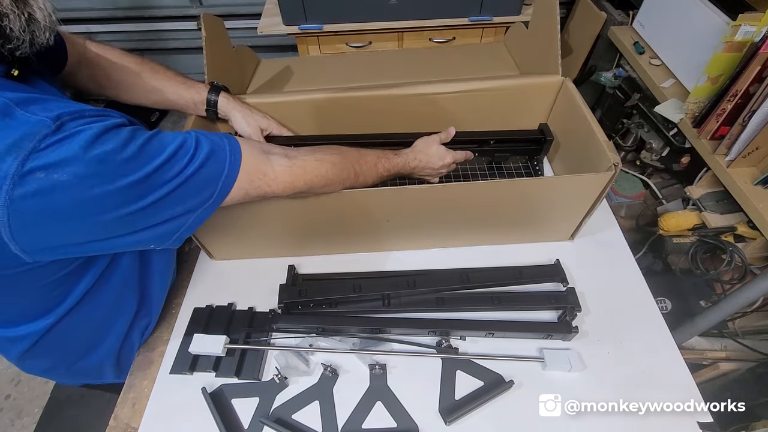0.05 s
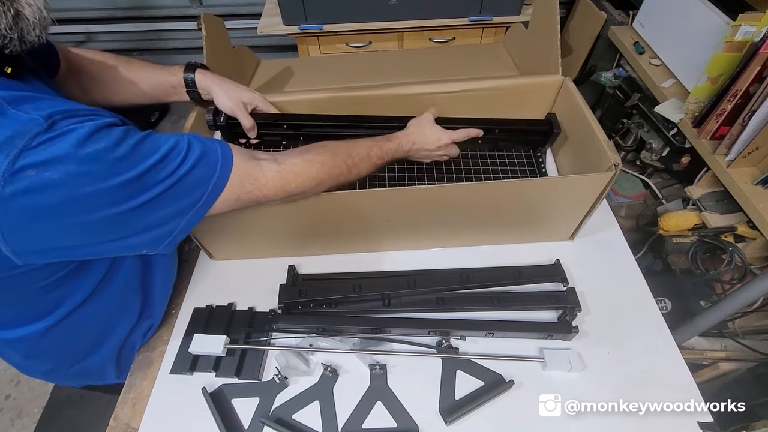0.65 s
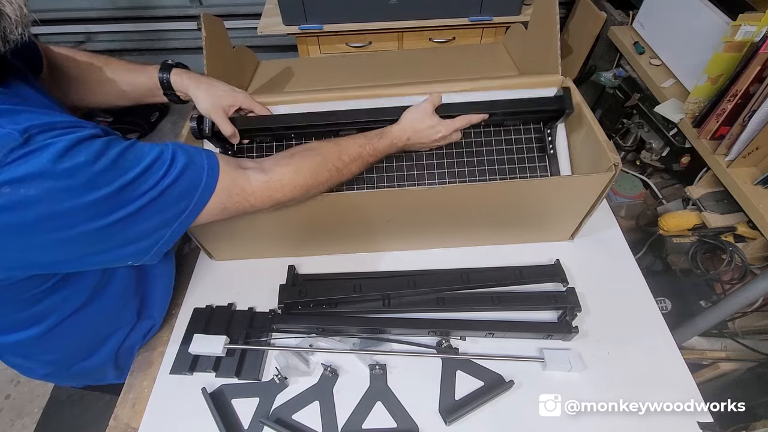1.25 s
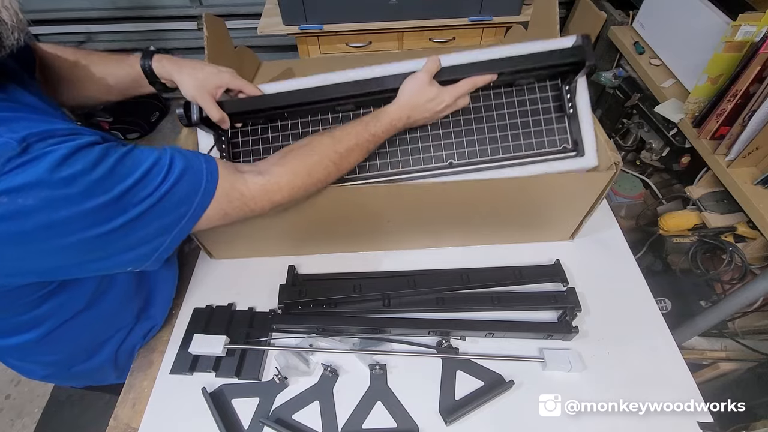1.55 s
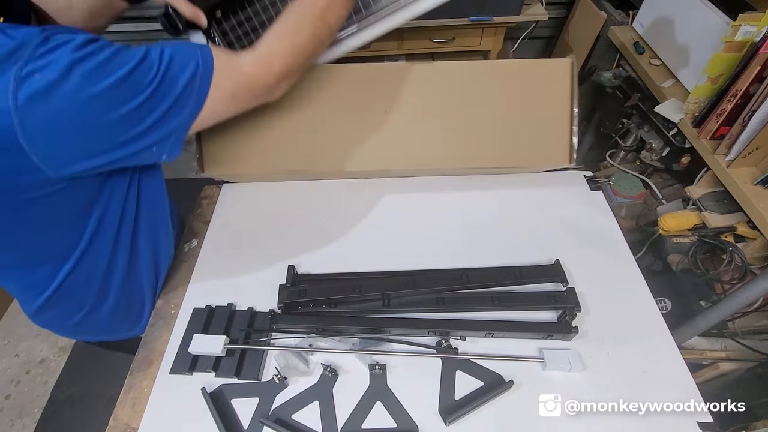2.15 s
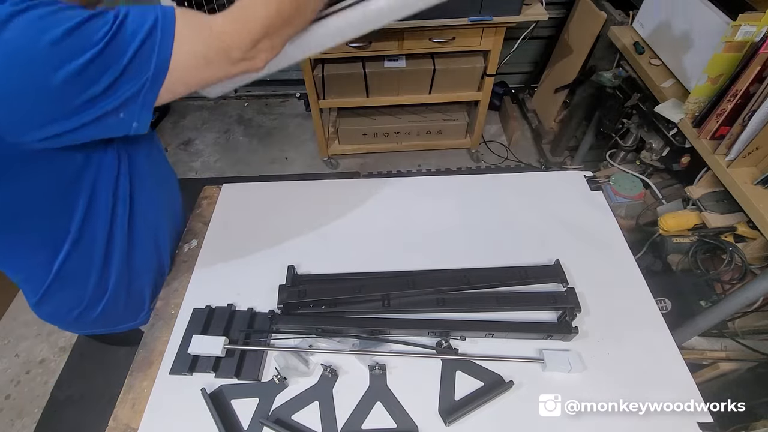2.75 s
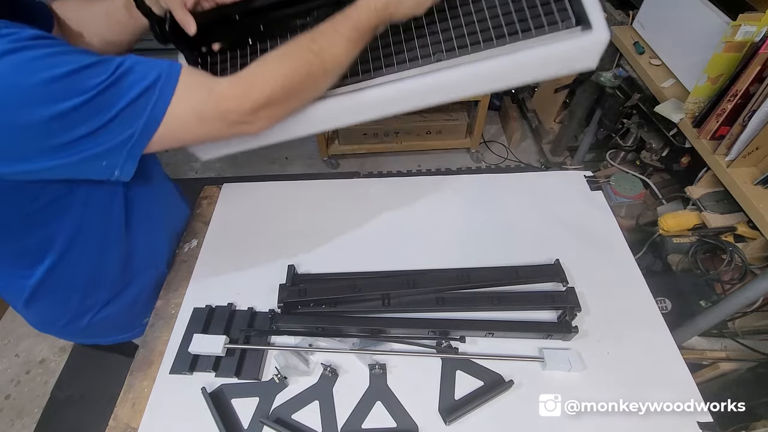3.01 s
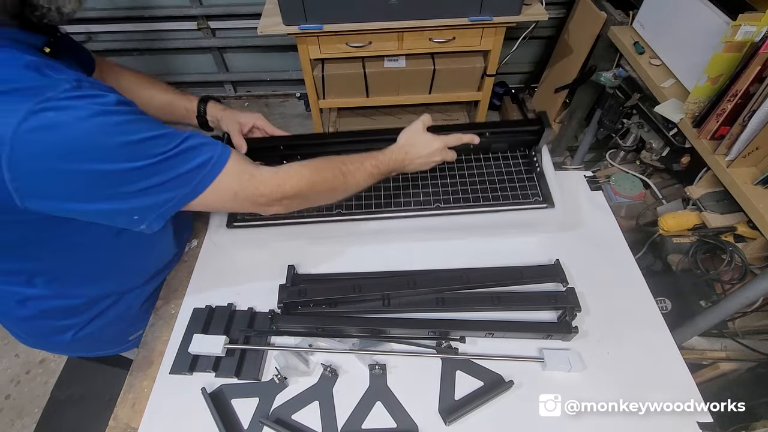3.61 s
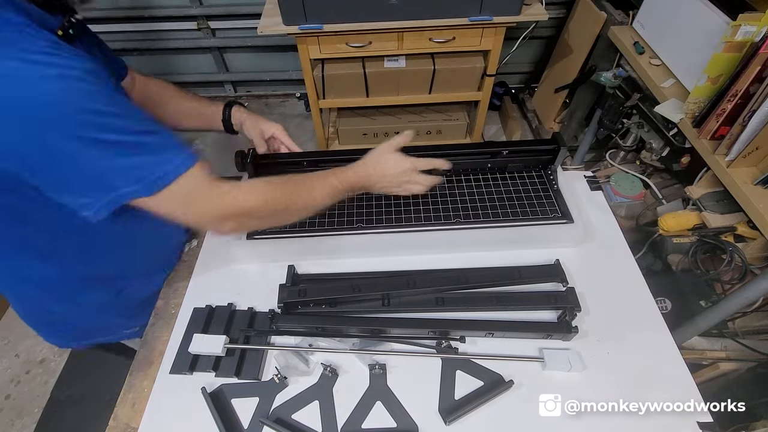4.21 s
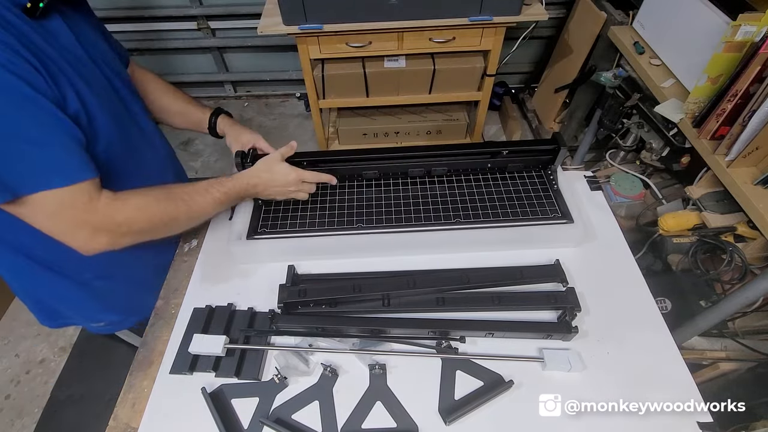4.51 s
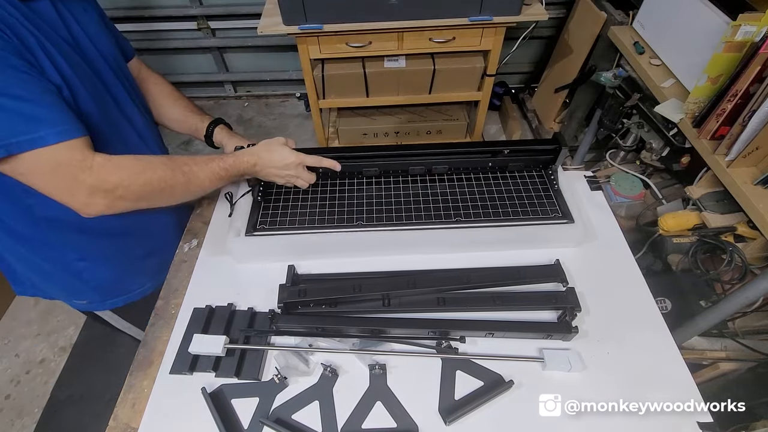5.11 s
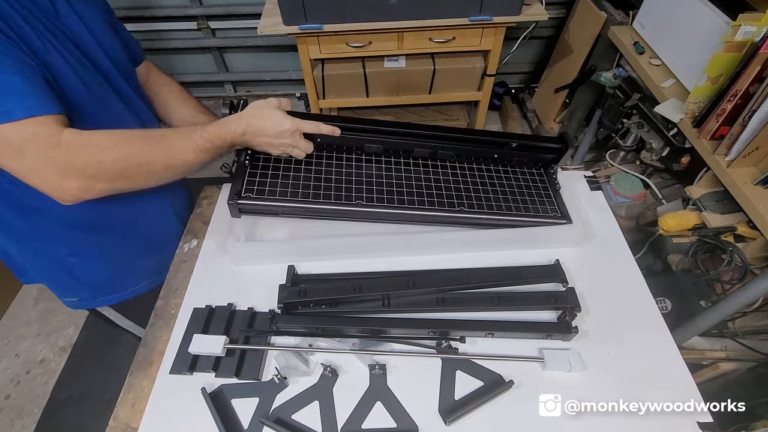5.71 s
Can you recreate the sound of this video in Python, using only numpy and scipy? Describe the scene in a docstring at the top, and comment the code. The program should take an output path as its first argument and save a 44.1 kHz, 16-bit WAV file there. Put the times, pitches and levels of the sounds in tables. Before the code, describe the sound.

In a quiet workshop with a short, dull echo, a foam-packed metal unit scrapes out of its cardboard box in several dry pulls. The box knocks, slides and falls to the floor in a run of hollow thumps and skids, with crisp snaps and one squeak. Faint handling follows as the unit is set down, then it drags briefly on the table, a small steel part clinking and the foam rustling.

```python
"""Short, rasping strokes of foam on cardboard: a packed metal unit is dragged out of a long box in a
workshop. The empty box slides off the table and tumbles on the floor with hollow booms, dry snaps
and a squeak. The unit is set down and shifted on the table; a small steel part clinks now and then.
The rubbing is stick-slip friction filtered by the panels. The blows excite damped modes of the
box's walls, the air inside it, the unit's frame and the steel part. The room adds a short tail."""
import sys
import numpy as np
from scipy import signal
from scipy.fft import rfft, irfft, next_fast_len
from scipy.io import wavfile
from scipy.ndimage import uniform_filter1d

SR = 44100
rng = np.random.default_rng(int(sys.argv[2]) if len(sys.argv) > 2 else 0)


def master(y):
    """Save y as 16-bit WAV."""
    cut = np.clip(np.atleast_2d(y).T, -1, 1)
    pcm = np.round(cut * 32767)  # scale
    wavfile.write(sys.argv[1], SR, pcm.astype(np.int16))


N = 258426
TIME = np.arange(N) / SR


def rubbing(judder_db=0.5, judder_per_s=130, hiss_db_per_db=1.13):
    """Sliding friction: slips drive the panels, and with pressure the hiss grows faster than the rasp."""
    # rubbing strokes: full_pressure_s, attack_s, hold_s, release_s, rasp_db, hiss_db, contact
    strokes = [(0.0, .05, 0.023, 0.075, -35.5, -41.5, "grip"),
               (0.142, 0.3, 0.13, 0.063, -38.5, -40.5, "grip"),
               (0.56, 0.027, 0.057, 0.3, -28.5, -44.5, "first pull"),
               (0.651, 0.075, .18, 0.095, -28.5, -38.5, "first pull"),
               (1.04, .1, .03, 0.15, -68, -96, "second pull"),
               (1.104, 0.044, 0.027, .08, -35, -69, "second pull"),
               (1.148, 0.064, 0.076, 0.072, -31.5, -40, "second pull"),
               (1.255, 0.057, 0.045, 0.075, -29.5, -31, "wall"),
               (1.346, 0.13, 0.033, 0.039, -55, -42, "wall"), (1.431, .05, 0.067, .1, -81, -73, "lift"),
               (1.541, 0.064, 0.053, .1, -62.5, -55.5, "lift"),
               (1.615, 0.041, 0.12, 0.059, -34, -39, "lift"),
               (1.794, 0.018, 0.17, 0.043, -40.5, -48.5, "lift"),
               (2.013, 0.025, 0.15, 0.33, -39, -44.5, "lift"),
               (2.23, 0.32, 0.09, 0.1, -28, -36, "box slide"),
               (2.744, 0.032, 0.033, 0.17, -26.5, -32.5, "floor skid"),
               (2.839, 0.064, 0.011, 0.19, -27, -39.5, "floor skid"),
               (2.903, 0.028, 0.013, .16, -27.5, -38, "floor skid"),
               (3.139, 0.036, 0.017, 0.077, -42, -60, "floor skid"),
               (3.264, 0.028, 0.023, 0.091, -51, -72.5, "foam brush"),
               (3.587, .02, 0.018, .15, -73, -83, "foam brush"),
               (3.694, 0.027, 0.013, 0.052, -52, -64, "foam brush"),
               (3.838, 0.092, 0.023, .12, -60.5, -60, "foam brush"),
               (3.948, 0.15, 0.16, 0.051, -52.5, -52.5, "foam brush"),
               (4.197, 0.022, 0.0068, 0.035, -38.5, -36.5, "hand slip"),
               (4.562, 0.11, 0.22, .2, -67, -81, "regrip"), (4.676, 0.024, 0.066, .12, -57, -90, "regrip"),
               (4.818, .05, 0.029, 0.18, -69.5, -78, "regrip"),
               (5.062, 0.16, 0.16, .1, -59.5, -76.5, "push"),
               (5.201, 0.094, 0.072, 0.099, -34.5, -42, "push"),
               (5.285, .04, 0.077, .05, -38.5, -60, "push"), (5.347, 0.033, 0.079, 0.043, -29, -39, "drag"),
               (5.473, 0.0088, 0.0067, 0.13, -49, -52, "settle"),
               (5.642, 0.0073, 0.018, 0.14, -44.5, -62, "unwrap"),
               (5.74, 0.071, 0.032, 0.082, -43, -44.5, "tilt"),
               (5.807, 0.15, 0.094, .09, -40.5, -41.5, "unwrap")]
    out = np.zeros(N)
    for at_s, attack_s, hold_s, release_s, rasp_db, hiss_db, contact in strokes:
        t = TIME[:SR] + max(at_s - .5, 0)
        friction = flap_reflection(slips(SR, per_s=7000, spread_db=3.5))
        rub = contact_filter(friction, contact)
        rasp = band(rub, (30, 5000)) / rms(band(rub, (600, 5000)))  # the midrange sets its level
        hiss = band(rub, (5000, 16000))
        press_db = pressure_db(t - at_s, attack_s, hold_s, release_s)
        stroke = rasp * from_db(rasp_db + press_db)
        stroke += hiss / rms(hiss) * from_db(hiss_db + hiss_db_per_db * press_db)
        add(out, t[0], stroke * from_db(judder_db * flutter(t, judder_per_s)))
    return out


def slips(size, per_s, spread_db, catches_per_s=45, catch_db=21):
    """Stick-slip: a Poisson train of unequal slips over smooth noise; now and then a fibre catches."""
    strength = from_db(spread_db * np.minimum(rng.exponential(1, size), 4))
    clicks = (rng.random(size) < per_s / SR) * strength * rng.choice([-1, 1], size)
    catches = (rng.random(size) < catches_per_s / SR) * rng.uniform(-1, 1, size)
    return clicks / rms(clicks) + rng.standard_normal(size) + from_db(catch_db) * catches


def pressure_db(t, attack_s, hold_s, release_s, depth_db=38.5, swell_db=2.2, tire_db=2.14):
    """Friction noise follows the normal force, which builds, swells, tires and lets go ever faster."""
    held = np.clip(t / max(hold_s, 1e-3), 0, 1)
    before = np.maximum(-t, 0) / max(attack_s, 1e-3)
    after = np.maximum(t - hold_s, 0) / max(release_s, 1e-3)
    return swell_db * np.sin(np.pi * held) - tire_db * (held - .5) - depth_db * (before + after) ** 1.24


def flap_reflection(x, echo=0.25, sweep=.2):
    """Comb filtering: a nearby flap returns an echo whose delay shifts as the contact travels."""
    t = TIME[:len(x)]
    lag_s = rng.uniform(0.001433, .004) * np.exp(sweep * flutter(t, 6))
    return x + echo * np.interp(t - lag_s, t, x)


def contact_filter(friction, contact):
    """Source and filter: each pair of touching surfaces gives the friction its own spectrum."""
    # spectral envelope of each contact: freq_hz, level_db
    grip_tone = [(47, -58), (80, -13), (162, -20), (391, -26), (436, -22), (635, -16), (965, -11.5),
                 (1430, -11.5), (1710, -23.5), (2720, -14), (3780, -14.5), (6710, -22), (7660, -26),
                 (11600, -39.5), (15500, -35)]
    first_pull_tone = [(120, -84), (200, -16.5), (407, -13.5), (488, -12), (596, -6), (641, -2),
                       (1130, 6.5), (1330, -1.5), (1680, -4), (2800, -4.5), (3360, -0.5), (8500, -0.5),
                       (15500, -26)]
    second_pull_tone = [(180, -33), (300, -30), (535, -29.5), (835, 6.5), (1180, -10), (1420, -11),
                        (1560, -1), (2000, -1), (2320, 12.5), (3020, 0.5), (8420, -30), (11300, -37),
                        (15500, -55)]
    wall_tone = [(41, -56), (70, -26), (265, -10.5), (467, -16), (511, -8.5), (572, -18), (717, -2.5),
                 (920, -5.5), (1290, -2.5), (2320, -8.5), (4000, -9), (5120, -30), (11800, -40),
                 (15500, -32)]
    lift_tone = [(59, -44), (100, -12.5), (184, -9.5), (293, 0.5), (447, -13.5), (758, -23), (898, -6),
                 (2000, -16), (2810, -18.5), (4280, -12.5), (6810, -25.5), (10400, -25), (15500, -44)]
    slide_tone = [(29, -40.5), (50, -16.5), (134, -1.5), (187, -17), (221, -5), (317, -8), (349, -7),
                  (622, -10), (735, -15), (1130, -14), (2560, -27), (8300, -19), (15500, -30.5)]
    skid_tone = [(47, -42.5), (80, -6), (246, 3), (409, -6), (456, 9.5), (1150, -2.5), (1370, -6),
                 (1570, -9.5), (3390, -12.5), (4510, -15.5), (15500, -53.5)]
    brush_tone = [(120, -66), (200, -26.5), (454, -28), (607, -17), (755, -15), (798, -11), (1110, -10),
                  (1260, -8), (2800, -17), (3360, -7.5), (4750, -3), (6240, 1.5), (10400, -1), (14200, -10),
                  (15500, -17)]
    slip_tone = [(240, -46), (400, -12), (614, -17), (761, -26), (1190, -3), (1710, -33), (1990, -8),
                 (3010, -21), (3210, -8.5), (4420, -15), (6000, -13), (7320, -25), (15500, -72)]
    regrip_tone = [(47, -50.5), (80, -8), (270, -8), (1010, -7.5), (1220, -9.5), (1360, -17), (2020, -15),
                   (3340, -27), (4390, -18), (12000, -45), (15600, -93), (22000, -120)]
    push_tone = [(120, -43), (200, -28), (422, -16.5), (534, -13), (641, -7), (906, -13.5), (1190, -6.5),
                 (1400, -8.5), (2060, -12.5), (5910, -18), (8200, -11), (11400, -28), (15500, -35)]
    drag_tone = [(35, -63), (60, -24), (159, -24), (278, -17), (368, -6), (464, -7.5), (546, -8),
                 (585, -2.5), (756, -4.5), (1020, -6.5), (2470, -16), (3420, -15), (7540, -22),
                 (15500, -38)]
    settle_tone = [(120, -65), (200, -32), (368, 2.5), (488, -3), (567, -3.5), (1010, -21), (2470, -32),
                   (7000, -27), (9100, -78), (15400, -120)]
    tilt_tone = [(88, -54), (150, -29), (410, 0), (577, -7), (739, 8), (1040, -23), (2020, -4), (4230, -30),
                 (4840, -24), (8230, -13), (14000, -34)]
    unwrap_tone = [(41, -48), (70, -11), (364, -16), (701, 2), (1100, -6), (1210, -1), (1480, -2.5),
                   (1980, 7.5), (3120, -4.5), (3820, -11), (4470, -13), (5010, -7), (7190, -1),
                   (13500, -12), (15500, -19)]
    # resonances and hollows of the panels at each contact: centre_hz, width_hz, gain_db
    grip_peaks = [(1775, 350, 23.5), (2800, 430, -21), (5570, 280, 6), (7900, 2500, 12), (10400, 2000, 1.5)]
    first_pull_peaks = [(1060, 98, -6), (1690, 580, 6.5), (2480, 1500, 3), (3550, 1300, 7),
                        (8500, 1000, 1.5), (10000, 1300, -8.5)]
    second_pull_peaks = [(900, 510, -8), (1200, 170, 13.5), (1660, 200, -9), (2345, 430, -32),
                         (2820, 630, -4.5)]
    wall_peaks = [(510, 64, 1.5), (770, 34, 7), (1350, 80, 4), (2340, 210, -9), (3500, 330, 6.5),
                  (14800, 2500, -29)]
    lift_peaks = [(310, 66, -0.5), (1140, 130, 1.5), (2720, 290, -9), (4240, 900, 3)]
    slide_peaks = [(141, 57, 14), (390, 50, 3.3), (652.4, 25, 8.5), (1050, 340, 4.4), (12300, 4000, 2.4)]
    skid_peaks = [(4636, 500, 5.7)]
    brush_peaks = [(1240, 130, 1.5), (2680, 720, -5.5), (4595, 1000, 5)]
    slip_peaks = [(1192, 150, 8.2), (4850, 530, 4.7), (6140, 640, 3.5)]
    push_peaks = [(1154, 50, 5.4), (2050, 460, 8.5), (8200, 3200, 3.2)]
    drag_peaks = [(498, 62, 11.3), (955, 140, 7.1), (7600, 1400, 4.5)]
    unwrap_peaks = [(2090, 380, -2.5), (4100, 610, -4), (4900, 840, 10)]
    tone, peaks = {
        "grip": (grip_tone, grip_peaks), "first pull": (first_pull_tone, first_pull_peaks),
        "second pull": (second_pull_tone, second_pull_peaks), "wall": (wall_tone, wall_peaks),
        "lift": (lift_tone, lift_peaks), "box slide": (slide_tone, slide_peaks),
        "floor skid": (skid_tone, skid_peaks), "foam brush": (brush_tone, brush_peaks),
        "hand slip": (slip_tone, slip_peaks), "regrip": (regrip_tone, []),
        "push": (push_tone, push_peaks), "drag": (drag_tone, drag_peaks),
        "settle": (settle_tone, []), "tilt": (tilt_tone, []), "unwrap": (unwrap_tone, unwrap_peaks),
    }[contact]
    return colour(friction, tone, peaks)


def box_blows(boom_rise_s=0.0056, crack_db_per_db=1.73):
    """Cavity and plate resonance: at each blow the enclosed air booms and the walls ring and clap."""
    # blows on the box: start_s, level_db, boom_db, hardness_db, t60_s, wall_pitch_hz
    blows = [(0.097, -30, -35, 4.5, 0.16, 430), (0.568, -23.5, -26, -2.5, 0.19, 235.5),
             (0.588, -31, -18.5, 8.5, 0.18, 267), (1.649, -14.5, -52, 5.5, 0.062, 660),
             (1.656, -16.5, -26.5, -0.5, 0.24, 402), (1.787, -29.5, -21, 0.5, 0.12, 313),
             (2.014, -18, -26, -2, 0.12, 452), (2.034, -19, -5, -2, 0.16, 435),
             (2.084, -26, -28.5, -5.5, 0.21, 295), (2.236, -18.5, -18, 3, 0.22, 607),
             (2.276, -15.5, -21.5, 2.5, 0.089, 638), (2.298, -28.5, -22.5, 5, 0.15, 268.6),
             (2.344, -36, -23, 12, 0.11, 443), (2.374, -48.5, -31.5, 0.5, 0.092, 229.7),
             (2.532, -32, -27, -0.5, .2, 232.4), (2.545, -20, -26, 3.5, 0.27, 274),
             (2.556, -8, -18, -2.5, 0.37, 496.6), (2.564, -18.5, -19.5, -2.5, 0.33, 368),
             (2.588, -18, -30, 1, 0.91, 342.3), (2.621, -18, -9.5, 3, 0.15, 471),
             (2.668, -10, -30, -0.5, 0.21, 378), (2.69, -20, -15, -0.5, 0.39, 419),
             (2.731, -13.5, -26.5, 7, 0.25, 294), (2.778, -7, -36, -2.5, 0.14, 345.5),
             (2.89, -17.5, -38, 2.5, 0.23, 419), (2.913, -11, -21.5, -19, .19, 348.5),
             (2.993, -20, -23, -5, 0.27, 387.4), (3.015, -7.5, -23, -2.5, 0.17, 471.7),
             (3.043, -15, -10.5, -1, 0.15, 320), (3.085, -25, -37.5, -4, 0.42, 231),
             (3.144, -16.5, -39, -11, 0.16, 303), (3.183, -28, -22, -26.5, 0.11, 333)]
    # pitch of the enclosed air as the box empties, falls and its flaps move: time_s, pitch_hz
    boom_pitch = [(1.79, 130), (2.03, 148), (2.3, 142), (2.55, 126), (2.69, 133), (2.92, 126), (3.02, 160),
                  (3.18, 172)]
    # air modes of the box: pitch_ratio, level_db, t60_ratio
    air_modes = [(0.601, -13, 1), (0.998, 0, 1), (1.219, -11.5, 0.51)]
    # spectral envelope of struck cardboard: freq_hz, level_db
    cardboard_tone = [(59, -32), (100, -1), (132, -8.5), (209, -3), (355, 2), (477, -4), (712, -10),
                      (977, -5), (2420, -27), (4660, -32.5), (9740, -47), (15500, -68.5)]
    # higher resonances of the walls: centre_hz, width_hz, gain_db
    cardboard_peaks = [(754, 19, 9.5), (925, 230, 4.5), (1370, 46, 7), (1591, 35, 1.5), (2160, 30, 5),
                       (2600, 80, -2.5), (2880, 24, 1), (3620, 18, -4.5)]
    out, t = np.zeros(N), TIME[:SR // 3]
    cardboard = crowded_modes(cardboard_tone, cardboard_peaks, lowest_hz=143)
    for start_s, level_db, boom_db, hardness_db, t60_s, wall_pitch_hz in blows:
        boom_hz = np.interp(start_s, *np.transpose(boom_pitch))
        boom = sum(from_db(db) * mode(t, boom_hz * pitch_ratio, boom_rise_s, t60_s * t60_ratio)
                   for pitch_ratio, db, t60_ratio in air_modes)
        add(out, start_s, from_db(boom_db + 3) * boom)
        add(out, start_s, from_db(level_db - 2) * wall_ring(wall_pitch_hz, t60_s))
        contact_s = 0.0021 * 2 ** (-hardness_db / 4)  # a harder blow is quicker, and brighter
        clap = knock(cardboard, t60_s, contact_s, thud_db=-1, slap_db=hardness_db - 7,
                     crack_db=crack_db_per_db * hardness_db - 18.5, crack_t60_ratio=1.0)
        add(out, start_s, from_db(level_db) * clap)
    return out


def wall_ring(pitch_hz, t60_s, reach_octaves=0.15, chance_db=2, flex=0.06):
    """Modal excitation: where a blow lands favours the modes near one pitch; flexing detunes them."""
    # wall modes of the box: freq_hz, level_db, t60_ratio
    wall_modes = [(236, -8, 1), (295.3, -2.5, 0.52), (364, -1, .9), (442, -5.5, 0.93), (474.4, 9.5, 0.68),
                  (545, -11.5, 1), (641, -4, 1), (790, -7.5, 0.68), (1020, -5, 0.58)]
    t = TIME[:SR // 3]
    hz, db, t60_ratio = np.transpose(wall_modes)
    hz = hz * np.exp(flex * rng.standard_normal(len(hz)))
    weight = from_db(db + chance_db * rng.standard_normal(len(hz)))
    weight /= 1 + (np.log2(hz / pitch_hz) / reach_octaves) ** 2
    weight = weight / np.linalg.norm(weight) * rng.choice([-1, 1], len(hz))
    return sum(gain * mode(t, freq_hz, 0.0005, t60_s * ratio)
               for gain, freq_hz, ratio in zip(weight, hz, t60_ratio))


def frame_taps():
    """Light impacts: fingers and foam excite the unit's frame; hardness trades thud for crack."""
    # taps of hands and unit: start_s, level_db, hardness_db
    taps = [(0.357, -50, 3), (0.393, -45.5, 9.5), (0.45, -44.5, 9.5), (0.464, -37.5, 6), (1.957, -26, 4.5),
            (1.984, -26.5, -3), (3.599, -66.5, -16), (3.657, -72.5, -19), (4.105, -60, -8.5),
            (4.194, -38.5, 9.5), (4.458, -70.5, -2.5), (4.551, -63, -13), (4.593, -63, -19.5),
            (4.674, -50.5, -13), (4.717, -42.5, -3.5), (5.34, -23, 6.5), (5.358, -25, -1),
            (5.473, -28, -0.5), (5.569, -55.5, 4), (5.592, -57, 0), (5.64, -45, 23.5), (5.733, -37.5, -2)]
    # spectral envelope of a tap: freq_hz, level_db
    tap_tone = [(71, -42), (120, 0), (245, 7.5), (332, -2.5), (1170, 7.5), (2200, -8.5), (2700, -11.5),
                (3110, -7), (4570, -10), (8420, -18), (15500, -79)]
    # resonances of the steel frame: centre_hz, width_hz, gain_db
    frame_peaks = [(540, 110, -2.5), (864, 24, 4), (1210, 110, 0.5), (1900, 140, 7.5), (2670, 230, 15),
                   (3650, 200, 6.5), (4000, 85, 12.5), (4800, 140, 1)]
    out, frame = np.zeros(N), crowded_modes(tap_tone, frame_peaks, lowest_hz=252.4)
    for start_s, level_db, hardness_db in taps:
        tap = knock(frame, t60_s=0.16, contact_s=.0014, thud_db=-5 - hardness_db, slap_db=-2,
                    crack_db=hardness_db - 15, crack_t60_ratio=0.74)
        add(out, start_s, from_db(level_db) * tap)
    return out


def crowded_modes(tone, peaks, lowest_hz):
    """Modal overlap: dense modes merge into noise, here in low, middle and high registers at rms 1."""
    ringing = colour(rng.standard_normal(2 * SR), tone, peaks)
    registers_hz = ((lowest_hz, 700), (700, 2200), (2200, 16000))
    return np.array([even(band(ringing, edges_hz), 0.01) for edges_hz in registers_hz])


def knock(ringing, t60_s, contact_s, thud_db, slap_db, crack_db, crack_t60_ratio):
    """Impact response: the contact time sets each register's rise, and damping sets its decay."""
    t = TIME[:SR // 2]
    start = int(rng.random() * SR)
    thud, slap, crack = ringing[:, start:start + len(t)]
    return (from_db(thud_db) * thud * strike(t, contact_s * 1.4, t60_s)
            + from_db(slap_db) * slap * strike(t, contact_s, t60_s * .8)
            + from_db(crack_db) * crack * strike(t, contact_s * 1.8, t60_s * crack_t60_ratio))


def steel_clinks(ring_db=-5, tick_db=-15, sparkle_db=-21, waver=.4):
    """Beating: a jogged steel part gives a bright tick and a thin, wavering ring of close modes."""
    # jolts of the part: start_s, level_db, t60_s
    jolts = [(1.9914, -33, 0.05), (2.048, -34, 0.3), (2.277, -29, 0.074), (2.3464, -27, 0.098),
             (2.4412, -42.5, 0.13), (5.4812, -39, 0.085), (5.4911, -30, 0.13), (5.527, -28.5, 0.05)]
    # its modes: freq_hz, level_db, t60_ratio
    steel_modes = [(8360, -6, 0.65), (8408, 2, 1.1), (8500, -9, .6), (14400, -25, 1)]
    out, t = np.zeros(N), TIME[:SR // 3]
    for start_s, level_db, t60_s in jolts:
        noise = rng.standard_normal(len(t))
        tick, sparkle = band(noise, (7400, 9800)), band(noise, (9800, 15500))
        onset = from_db(tick_db) * tick / rms(tick) + from_db(sparkle_db) * sparkle / rms(sparkle)
        onset *= strike(t, rise_s=.001, t60_s=.06)
        ring = sum(from_db(db) * mode(t, hz, 0.0011, t60_s * ratio) for hz, db, ratio in steel_modes)
        ring *= 1 + waver * flutter(t, per_s=220)
        add(out, start_s, from_db(level_db) * (onset + from_db(ring_db) * ring))
    return out


def crease_snaps(edges_hz=(2200, 9000)):
    """Fracture: fibres in a cardboard crease release their strain in a short, dry crack."""
    # snapping creases: start_s, level_db
    snaps = [(0.5678, -24), (0.652, -24), (1.9585, -41), (1.981, -35), (1.9915, -26), (2.2755, -19),
             (2.2975, -26), (2.308, -21), (2.5637, -21), (2.7296, -18)]
    out, t = np.zeros(N), TIME[:SR // 10]
    envelope = strike(t, rise_s=0.00017, t60_s=0.015)
    for start_s, level_db in snaps:
        crack = band(rng.standard_normal(len(t)), edges_hz)
        add(out, start_s, from_db(level_db - 1) * crack / rms(crack) * envelope)
    return out


def corner_squeak(edges_hz=(1190, 1470)):
    """Stick-slip resonance: a corner of the box catches on the floor and sounds in one narrow band."""
    # the squeak: start_s, level_db
    squeaks = [(2.8398, -13.5)]
    out, t = np.zeros(N), TIME[:SR // 4]
    for start_s, level_db in squeaks:
        chirr = even(band(rng.standard_normal(SR), edges_hz), 0.0089)[-len(t):]
        add(out, start_s, from_db(level_db - 3) * chirr * strike(t, rise_s=0.0027, t60_s=0.087))
    return out


def workshop(x, t60_s=0.23, dull_hz=2500, wet_db=-15):
    """Diffuse reverberation: a cluttered room scatters the sound into a short, dull tail."""
    t = TIME[:SR // 2]
    tail = rng.standard_normal(len(t)) * strike(t, 0.008, t60_s)
    tail /= np.linalg.norm(tail)
    tail = signal.sosfilt(signal.butter(1, dull_hz, fs=SR, output="sos"), tail)
    return x + from_db(wet_db) * signal.fftconvolve(x, tail)[:N]


def room_air(level_db=-76.5):
    """Ambient noise: the still room has a faint, steady floor, strongest in the bass."""
    # spectral envelope of the air: freq_hz, level_db
    air_tone = [(24, -36.5), (40, -7.5), (103, 11), (502, -2), (1170, -7), (2340, -22.5), (5040, -16),
                (5990, -22), (15000, -43)]
    air = colour(rng.standard_normal(N), air_tone, [])
    return from_db(level_db) * air / rms(air)


def mode(t, hz, rise_s, t60_s):
    """Damped oscillator: one decaying sinusoid."""
    return np.sin(2 * np.pi * hz * t) * strike(t, rise_s, t60_s)


def strike(t, rise_s, t60_s):
    """Exponential damping: after a smooth, quick rise, a blow falls 60 dB in t60_s."""
    rise = (1 - np.exp(-2 * t / max(rise_s, 1e-4))) ** 2
    return rise * np.exp(-np.log(1000) * t / max(t60_s, 1e-2))


def colour(x, tone, peaks):
    """Linear filtering: a broad spectral envelope and bell-shaped resonances add in decibels."""
    size = next_fast_len(len(x))
    hz = np.maximum(np.arange(size // 2 + 1) * SR / size, 1)
    tone_hz, tone_db = np.transpose(tone)
    db = np.interp(np.log(hz), np.log(tone_hz), tone_db)
    for centre_hz, width_hz, gain_db in peaks:
        db += gain_db / (1 + (2 * (hz - centre_hz) / width_hz) ** 2)
    return irfft(rfft(x, size) * from_db(db), size)[:len(x)]


def band(x, edges_hz):
    """Steep band-pass filter."""
    return signal.sosfilt(signal.butter(5, edges_hz, "band", fs=SR, output="sos"), x)


def flutter(t, per_s):
    """Random modulation with a spread of about 1."""
    return np.interp(t * per_s, np.arange(2000), rng.standard_normal(2000))


def even(x, span_s):
    """Envelope flattening: dividing by the running rms holds a noise at rms 1."""
    power = uniform_filter1d(x ** 2, max(int(span_s * SR), 2))
    return x / np.sqrt(np.abs(power) + 1e-20)


def from_db(db):
    """Decibels to amplitude ratio."""
    return 10 ** (np.asarray(db) / 20)


def rms(x):
    """Root mean square."""
    return np.sqrt(np.mean(x ** 2) + 1e-20)


def add(out, start_s, sound):
    """Superposition: mix a sound into out from start_s."""
    at = int(np.clip(round(start_s * SR), 0, N - 1))
    out[at:at + len(sound)] += sound[:N - at]


def scene():
    """Superposition: rubs, blows, taps, clinks, snaps and a squeak sum in the room, over quiet air."""
    air = room_air()
    handling = (from_db(-1.5) * rubbing() + box_blows() + frame_taps()
                + steel_clinks() + crease_snaps() + corner_squeak())
    return (workshop(handling) + air)[None]


def record(dry, low_cut_hz=58, high_cut_hz=15750, ceiling=.76):
    """Band limiting and saturation: the microphone sheds deep bass, rounds peaks and cuts the top."""
    lean = signal.sosfilt(signal.butter(3, low_cut_hz, "high", fs=SR, output="sos"), dry)
    rounded = lean / (1 + (lean / ceiling) ** 8) ** (1 / 8)
    return signal.sosfilt(signal.ellip(12, .1, 90, high_cut_hz, fs=SR, output="sos"), rounded)


dry = scene()
out = record(dry)
master(out)
```